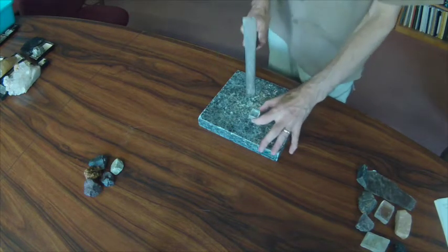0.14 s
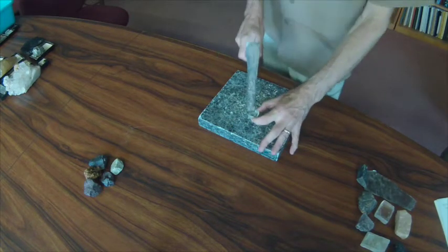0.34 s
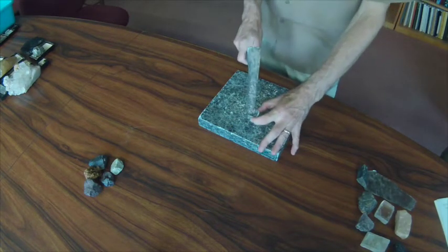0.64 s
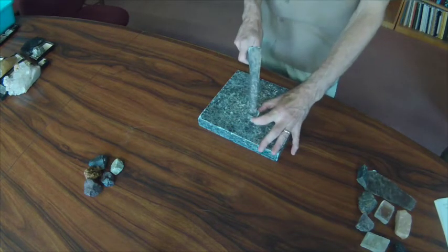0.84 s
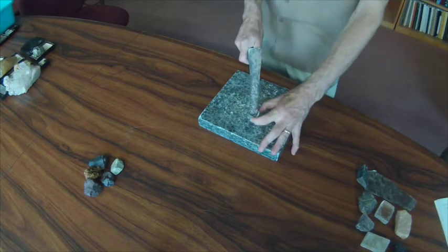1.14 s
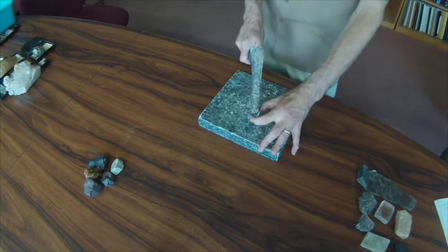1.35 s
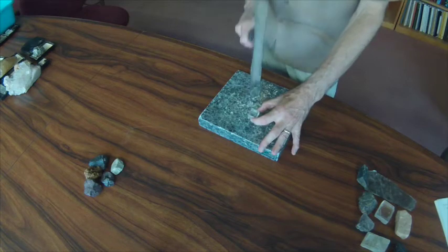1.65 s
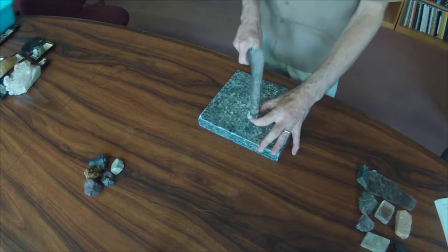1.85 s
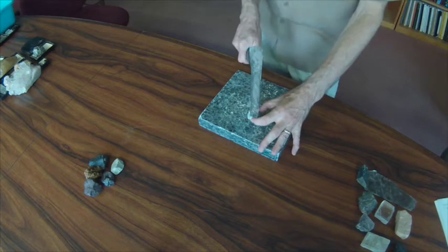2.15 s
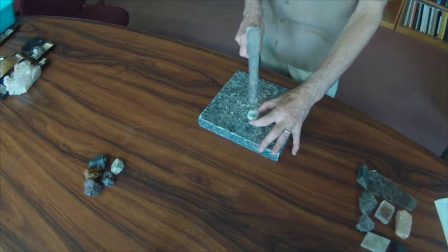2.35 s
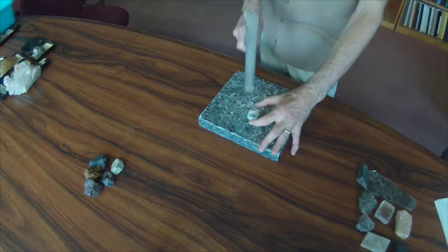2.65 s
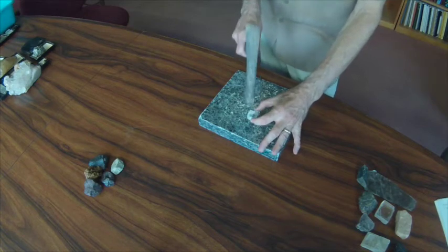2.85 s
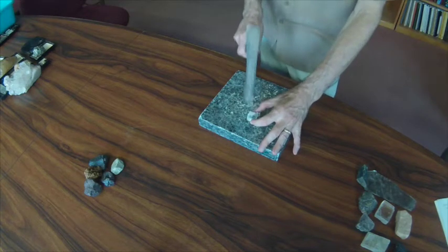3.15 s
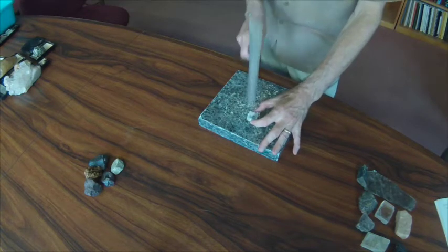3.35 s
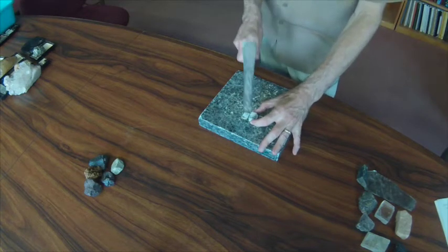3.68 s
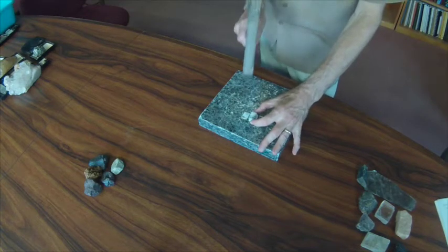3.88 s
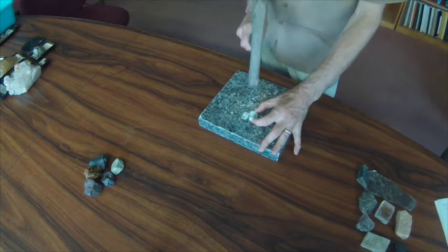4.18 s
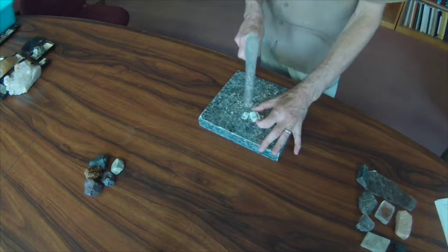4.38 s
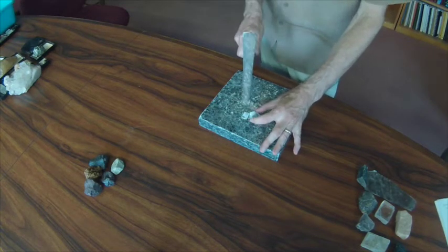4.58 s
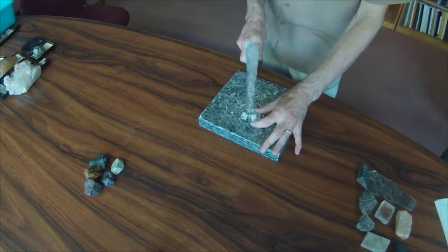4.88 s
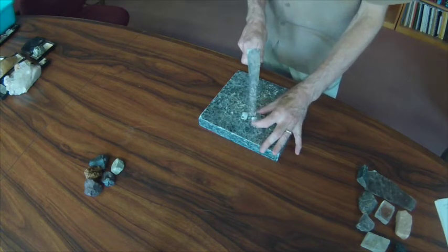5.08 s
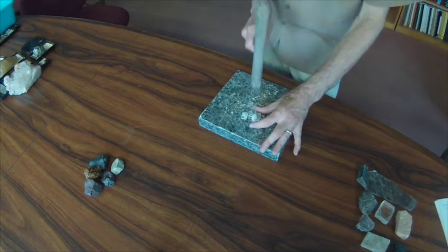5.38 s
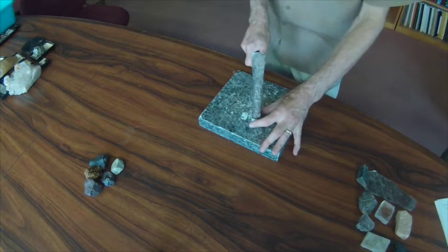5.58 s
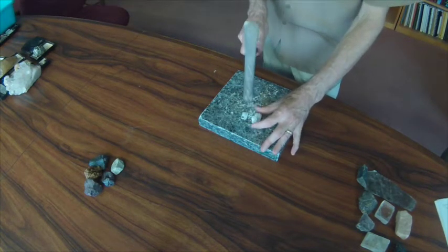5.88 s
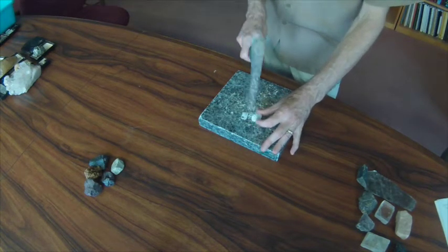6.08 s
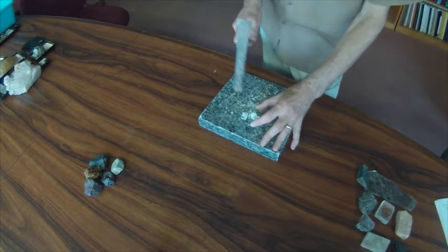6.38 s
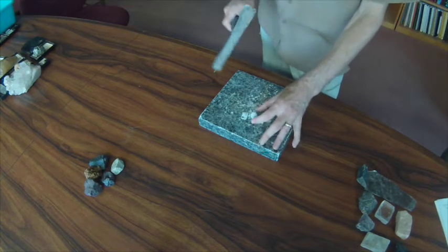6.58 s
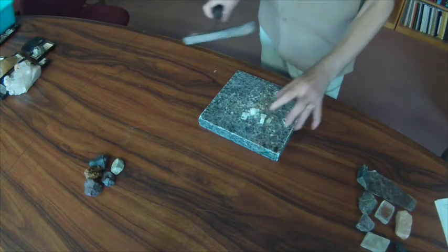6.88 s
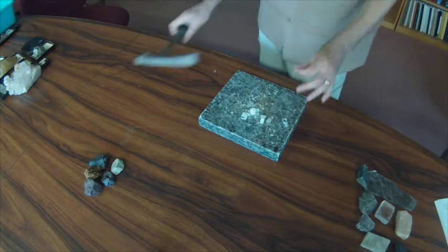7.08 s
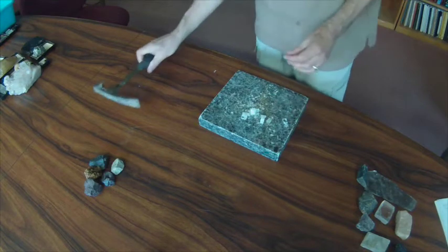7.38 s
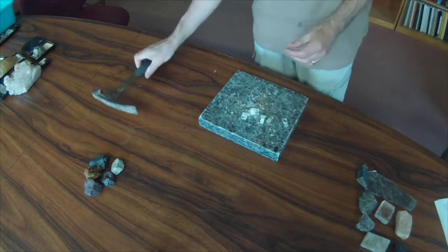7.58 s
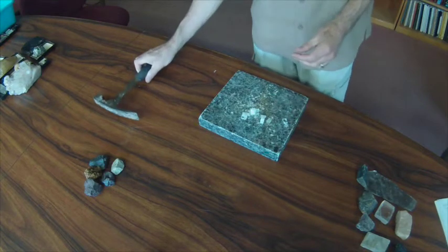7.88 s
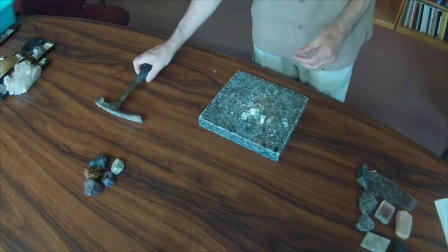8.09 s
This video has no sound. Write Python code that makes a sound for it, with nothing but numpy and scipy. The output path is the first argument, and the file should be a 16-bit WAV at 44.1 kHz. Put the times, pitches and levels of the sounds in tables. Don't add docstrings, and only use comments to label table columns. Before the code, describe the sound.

A faint tap, then three loud, sharp hammer blows on a crystal over a stone slab, with chips and steel ring, and a hammer clattering onto wood.

```python
import sys
import numpy as np
from scipy import signal
from scipy.fft import rfft, irfft, next_fast_len
from scipy.io import wavfile
from scipy.ndimage import uniform_filter1d

SR = 44100
rng = np.random.default_rng(int(sys.argv[2]) if len(sys.argv) > 2 else 0)


def boost_factor(decibels):
    exponent = np.asarray(decibels, float) / 20
    return 10 ** exponent


def materialize(psi):
    bounded = np.clip(np.atleast_2d(psi).T, -1, 1)
    quanta = np.round(bounded * 32767).astype(np.int16)
    wavfile.write(sys.argv[1], SR, quanta)


N = 363075


def along(points, hz):
    f, v = np.transpose(points)
    return np.interp(np.log(hz + 1), np.log(f + 1), v)


def unit(x):
    return x / np.sqrt(np.mean(x ** 2) + 1e-20)


def filtered(x, response):
    m = next_fast_len(len(x) + SR // 2)
    return irfft(rfft(x, m) * response(np.fft.rfftfreq(m, 1 / SR)), m)[:len(x)]


def noise_shaped(x, curve):
    return unit(filtered(x, lambda f: boost_factor(along(curve, f))))


def resonance(f, hz, width):
    return 1j * f * width / (hz * hz - f * f + 1j * f * width)


def add(track, s, sound):
    part = track[round(s * SR):][:len(sound)]
    part += sound[:len(part)]


# f/Hz, level/dB per Hz
RATTLE_CURVE = [(500, -41), (1000, -10.5), (1500, 8.5), (2200, -0.5), (3200, -2.5), (4300, -14),
                (6000, -26.5), (8000, -33.5), (14000, -44)]


def knocks(events, body, rattle_t60):
    force, rattle = np.zeros(N), np.zeros(N)
    t = np.arange(SR // 4) / SR
    for s, db, contact_ms, rattle_db, *_ in events:
        u = t[:SR // 100] * 1000 / contact_ms
        pulse = u ** 4 * np.exp(-u) / (24 * contact_ms)
        add(force, s, boost_factor(db) * pulse)
        dense = noise_shaped(rng.standard_normal(len(t)), RATTLE_CURVE)
        onset = 1 - np.exp(-t / 0.001)
        add(rattle, s, boost_factor(rattle_db - 60 * t / rattle_t60) * onset * dense)

    def modes(f):
        total = 0
        for hz, width, db, side in body:
            total = total + side * boost_factor(db) * resonance(f, hz, width) * 1000 / (2 * np.pi * width)
        return total

    return rattle + filtered(force, modes)


# f/Hz, level/dB, t60/s
HEAD_PARTIALS = [(3230, 0, .36), (7680, -24, .14)]


def head(events):
    ring, t = np.zeros(N), np.arange(SR // 2) / SR
    for s, *_, ring_db in events:
        drift = 0.075 * np.cumsum(rng.standard_normal(len(t)))
        for hz, db, t60 in HEAD_PARTIALS:
            add(ring, s, boost_factor(ring_db + db - 60 * t / t60) * np.sin(2 * np.pi * hz * t + drift))
    return ring


# t/s, knock level/dB, contact/ms, rattle level/dB, head ring level/dB
HAMMER_BLOWS = [
    (1.3244, -15.5, .13, -52, -67),
    (1.875, 3.5, 0.061, -19.5, -38),
    (1.9049, -2.5, 0.03, -32, -51),
    (3.4272, 4.5, 0.056, -17.5, -35.5),
    (5.5039, 5, 0.066, -17.5, -41),
]
# f/Hz, width/Hz, ring level/dB, side of the nodal line/+-1
SLAB_MODES = [(64, 32, -21, 1), (112, 30, -17, -1), (205, 90, -12, 1), (265, 40, -9, 1), (330, 13, -22, 1),
              (387, 26, -14, -1), (460, 30, -11, 1), (535, 26, -11, -1), (625, 30, -15, 1),
              (692, 40, -5.5, 1), (805, 52, -2.5, 1), (870, 60, -7, -1), (945, 32, -12, 1),
              (1035, 50, -17, -1), (1100, 60, -18, 1), (1240, 130, -19, -1), (1670, 250, -18, 1),
              (2200, 400, -17, -1), (3180, 450, -17, 1), (4170, 500, -21, -1)]


def blows():
    lead_s, lead_db, lead_ms = 0.00146, -13.5, 0.15
    leads = [(s - lead_s, db + lead_db, lead_ms, rattle_db + lead_db)
             for s, db, _, rattle_db, _ in HAMMER_BLOWS]
    return knocks(list(HAMMER_BLOWS) + leads, SLAB_MODES, rattle_t60=0.11) + head(HAMMER_BLOWS)


# t/s, level/dB, centre f/Hz
CRYSTAL_BREAKS = [(1.3237, -41, 7900), (1.3239, -45.5, 5000), (1.8746, -15, 12600), (1.8748, -22, 8600),
                  (1.9052, -21.5, 3730), (2.3437, -48, 3030), (3.4266, -24.5, 11900), (3.4278, -48, 7800),
                  (5.5032, -27, 12700), (5.5043, -41, 5600), (5.6901, -48, 11000), (7.2869, -49, 6500),
                  (7.305, -47, 5500), (7.35, -62, 13000)]


def cracks(events):
    faint_db, faint_t60_s, t60_s_per_db = -49, 0.007, 0.9
    out, t = np.zeros(N), np.arange(SR // 20) / SR
    for s, db, hz in events:
        t60 = faint_t60_s + t60_s_per_db * max(db - faint_db, 0)
        snap, crumble = boost_factor(-60 * t / 0.002), boost_factor(-15 - 60 * t / t60)
        burst = (snap + crumble) * rng.standard_normal(len(t))
        burst = filtered(burst, lambda f: resonance(f, hz, 0.5 * hz) ** 2)
        add(out, s, boost_factor(db) * burst / np.abs(burst).max())
    return out


# t/s, knock level/dB, contact/ms
ROCKING_CONTACTS = [
    (8.0477, -7, 0.033),
    (8.0863, -8.5, 0.036),
    (8.1072, -1, 0.14),
    (8.1126, -5.5, 0.035),
    (8.115, -4, 0.092),
    (8.1231, -7, 0.093),
    (8.1346, -7, 0.046),
    (8.1443, -8.5, 0.052),
    (8.153, -3.5, .096),
    (8.176, -33, .07),
]
# f/Hz, width/Hz, ring level/dB, side of the nodal line/+-1
TABLE_MODES = [(68, 36, -27, 1), (140, 60, -21, -1), (352, 45, -19, 1), (470, 60, -18, 1),
               (565, 88, -7, -1), (760, 190, 5, 1), (974, 100, -8, -1), (1150, 110, -16, 1),
               (1410, 170, -9, -1), (1710, 160, -6, 1), (2030, 220, -10, -1), (3300, 450, -15, 1),
               (4300, 600, -21, -1)]
# f/Hz, level/dB
EDGE_TICK = [(5500, -3.5), (8800, -16)]


def laid_down():
    shake_db, shake_loss, tick_db, tick_loss = -15.5, 150, -23.5, 250
    tick_lag_s = 0.00027
    rocks, ticks = [], []
    for s, db, ms in ROCKING_CONTACTS:
        rocks.append((s, db, ms, db + shake_db - shake_loss * ms))
        for hz, level in EDGE_TICK:
            ticks.append((s + tick_lag_s, db + tick_db - tick_loss * ms + level, hz))
    return knocks(rocks, TABLE_MODES, rattle_t60=0.045) + cracks(ticks)


# delay t/s, level/dB
WALL_ECHOES = [(.0072, -16), (.0091, -6), (.0126, -15), (.0173, -18), (.0197, -18), (.0220, -7),
               (.0273, -17), (.031, -17)]
# f/Hz, t60/s
ROOM_DECAY = [(60, 0.5), (160, 0.36), (400, 0.37), (800, 0.24), (1200, 0.31), (2900, 0.27), (6000, 0.38),
              (12000, 0.29)]
# f/Hz, level/dB
TAIL_CURVE = [(40, -6), (80, 2), (260, -8.5), (350, 0), (800, -6), (1250, -4.5), (4200, -9.5),
              (12000, -2.5)]


def room(x, walls_db, wet_db):
    hz, t, z = signal.stft(rng.standard_normal(SR // 2), SR, nperseg=1024)
    t60 = along(ROOM_DECAY, hz)[:, None]
    build_up = np.clip((np.arange(SR // 2) / SR - 0.003) / 0.012, 0, 1)
    decay = boost_factor(along(TAIL_CURVE, hz)[:, None] - 60 * t / t60)
    decay = decay / np.sqrt(SR * t60 / 20)
    tail = signal.istft(z * decay, SR, nperseg=1024)[1][:SR // 2]
    answer = boost_factor(wet_db) * build_up * tail
    answer[0] += 1
    for delay, db in WALL_ECHOES:
        answer[round(delay * SR)] += boost_factor(db + walls_db)
    return signal.fftconvolve(x, answer)[:N]


# f/Hz, level/dB per Hz
AIR_CURVE = [(15, -43), (30, -12.5), (60, -5), (95, -11.5), (150, -4), (270, -8.5), (600, -7.5),
             (1000, -19), (1300, -25), (1900, -20), (3000, -31.5), (6500, -41), (10700, -47),
             (15000, -53.5)]
# f/Hz, width/Hz, level/dB
HOUSING = [(122, 23, -50.5), (436.3, 32, -57), (597, 45, -58), (10460, 820, -81.5)]


def fan():
    z = signal.stft(rng.standard_normal(N), nperseg=512)[2]
    field = uniform_filter1d(rng.standard_normal(z.shape), 6, 0)
    field = uniform_filter1d(field, 12, 1)
    patchy = signal.istft(z * boost_factor(1.19 * unit(field)), nperseg=512)[1][:N]
    air = boost_factor(-44) * noise_shaped(patchy, AIR_CURVE)
    for hz, width, db in HOUSING:
        air += boost_factor(db) * unit(filtered(rng.standard_normal(N), lambda f: resonance(f, hz, width) ** 2))
    return air


def scene():
    struck = room(blows(), walls_db=-3.5, wet_db=5.0)
    snaps = room(cracks(CRYSTAL_BREAKS), walls_db=-4.5, wet_db=-11.0)
    laid = room(laid_down(), walls_db=-9, wet_db=-1)
    return (struck + snaps + laid + fan())[None]


def low_pass(x):
    return signal.sosfilt(signal.butter(12, 16470, fs=SR, output="sos"), x)


def record(dry):
    threshold_db, duck_per_db, climb_db_per_s, top_hz = -18.0, 0.91, 21, 15250

    def smooth(v, s):
        return signal.lfilter([1 / (s * SR)], [1, 1 / (s * SR) - 1], v)

    climb_db = climb_db_per_s * np.arange(N) / SR
    level_db = 10 * np.log10(smooth(dry[0] ** 2, 0.012) + 1e-12)
    over_db = duck_per_db * np.maximum(level_db - threshold_db, 0)
    duck_db = np.maximum.accumulate(over_db + climb_db) - climb_db
    x = dry[0] * boost_factor(-smooth(duck_db, 0.015))
    x = filtered(x, lambda f: 1 / (1 + 1j * (f / top_hz) ** 90))[None]
    x = x / (1 + np.abs(x) ** 12) ** (1 / 12)
    return low_pass(x)


dry = scene()
out = record(dry)
materialize(out)
```